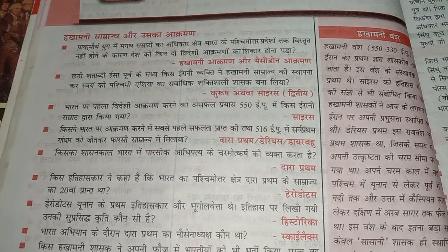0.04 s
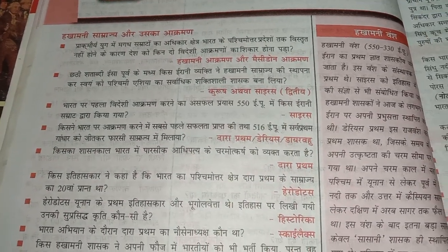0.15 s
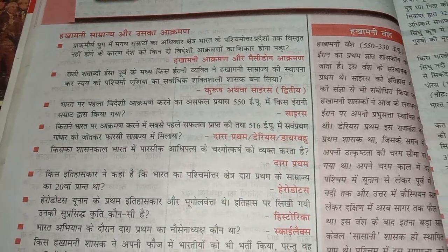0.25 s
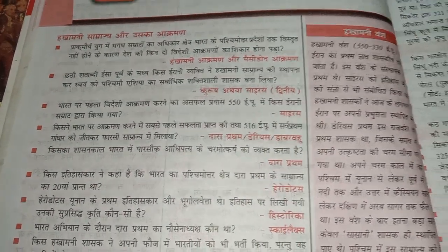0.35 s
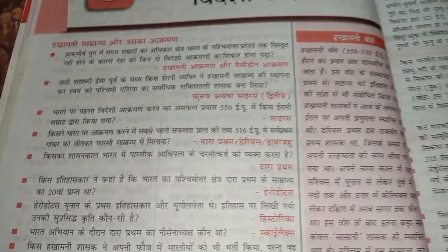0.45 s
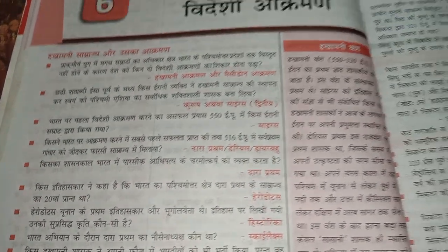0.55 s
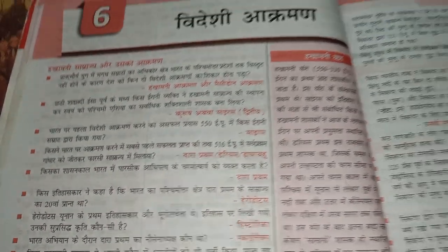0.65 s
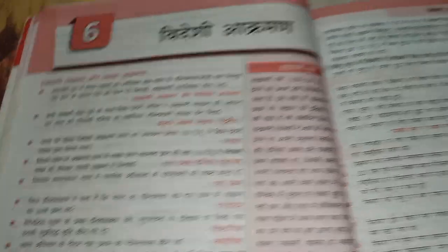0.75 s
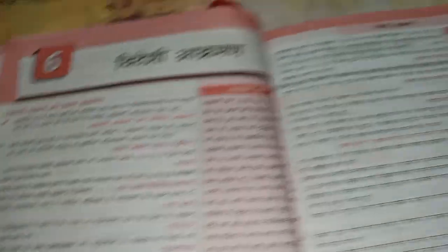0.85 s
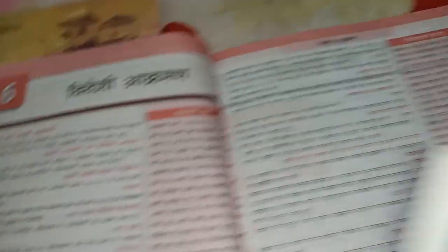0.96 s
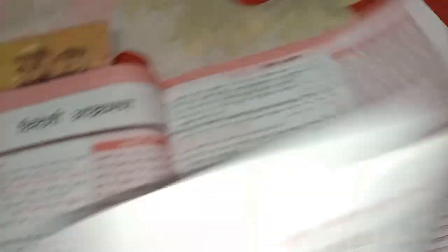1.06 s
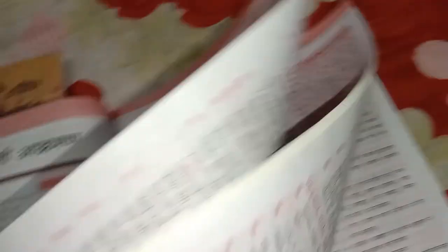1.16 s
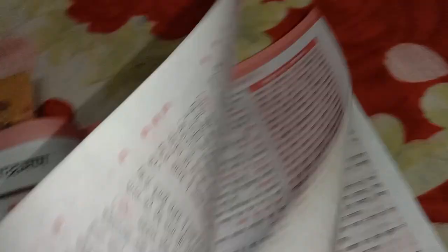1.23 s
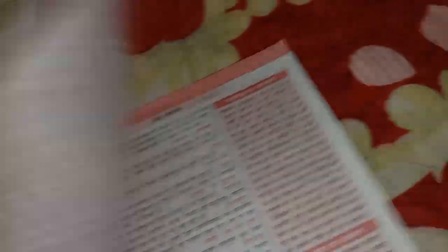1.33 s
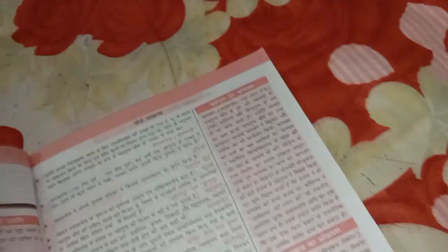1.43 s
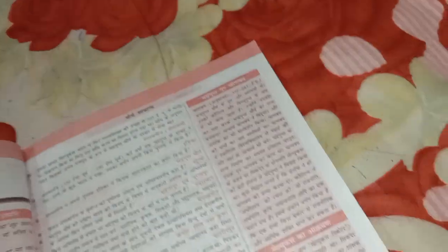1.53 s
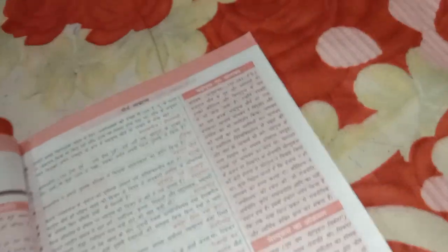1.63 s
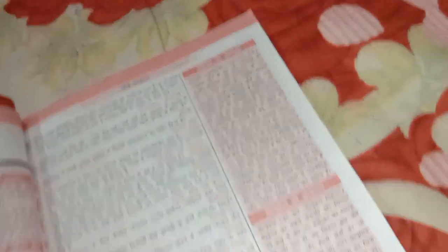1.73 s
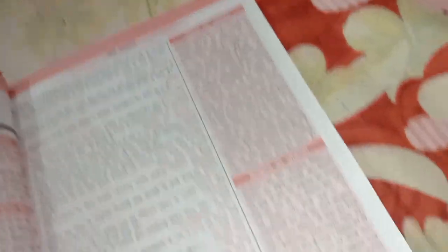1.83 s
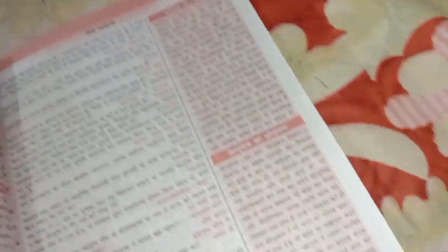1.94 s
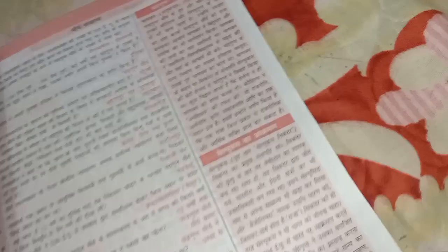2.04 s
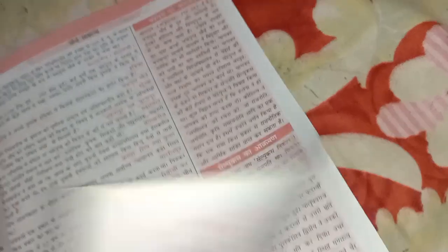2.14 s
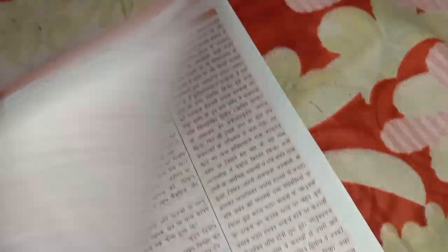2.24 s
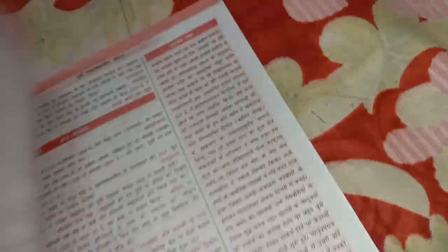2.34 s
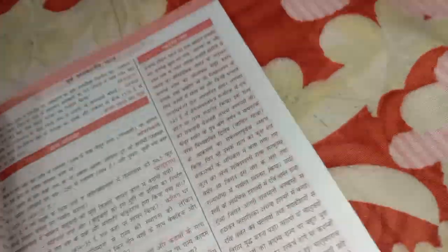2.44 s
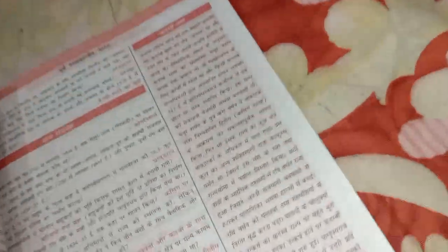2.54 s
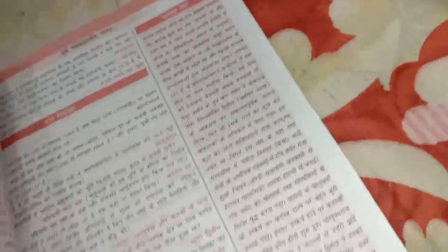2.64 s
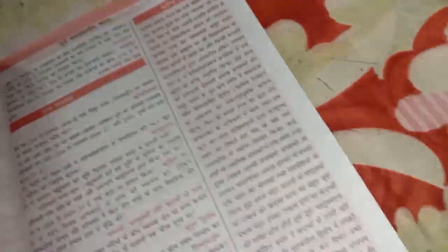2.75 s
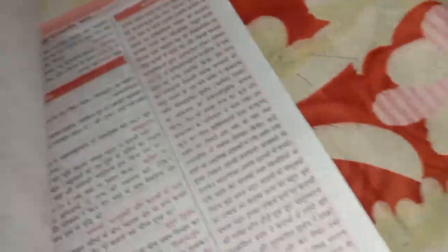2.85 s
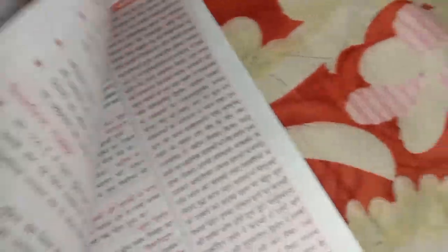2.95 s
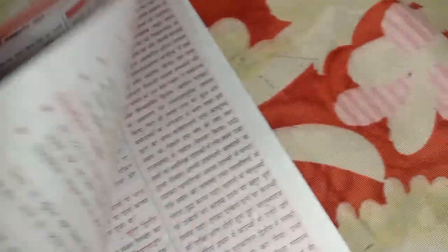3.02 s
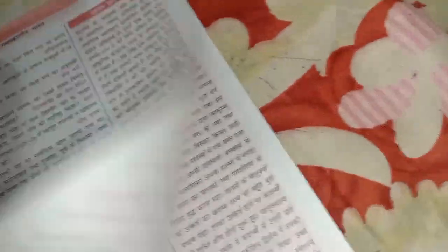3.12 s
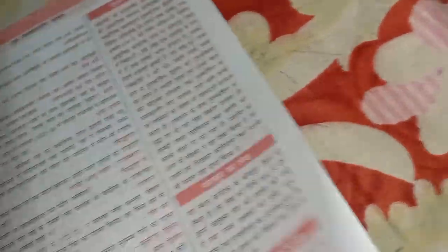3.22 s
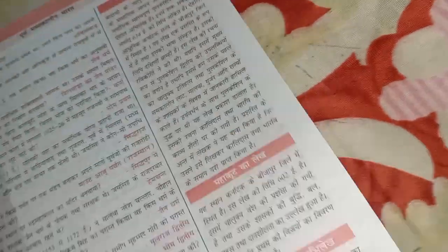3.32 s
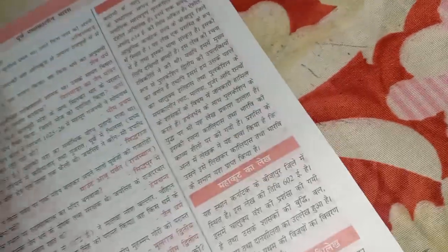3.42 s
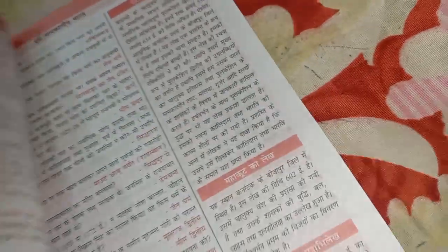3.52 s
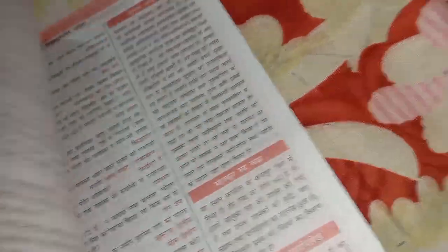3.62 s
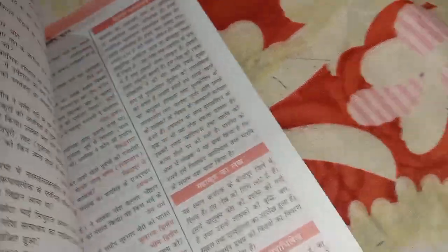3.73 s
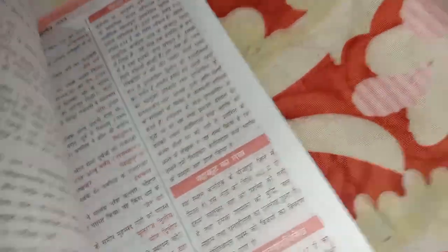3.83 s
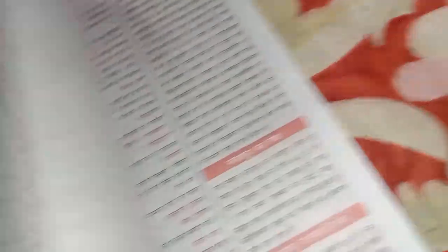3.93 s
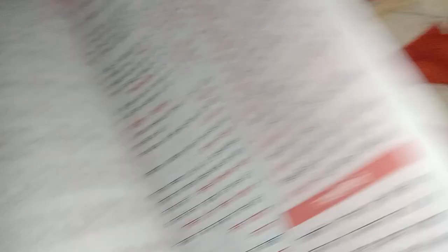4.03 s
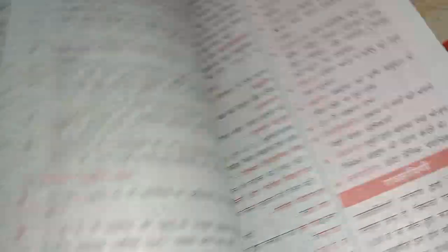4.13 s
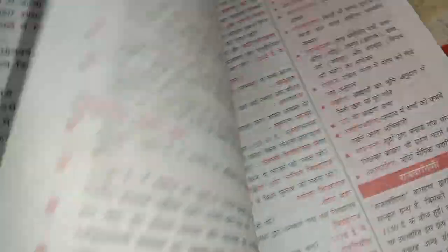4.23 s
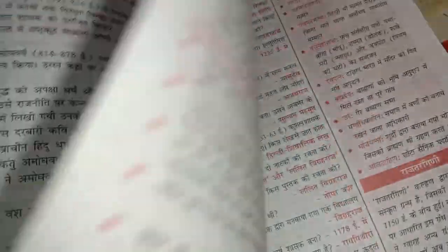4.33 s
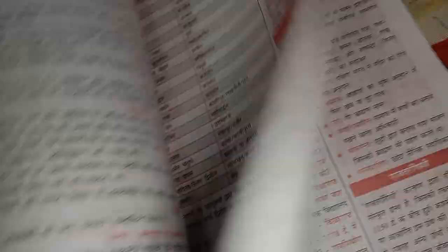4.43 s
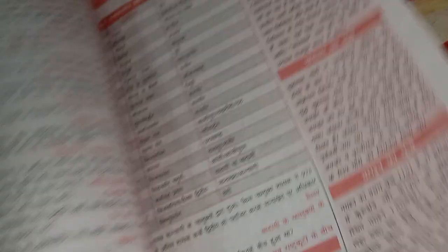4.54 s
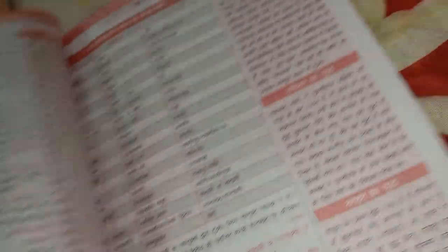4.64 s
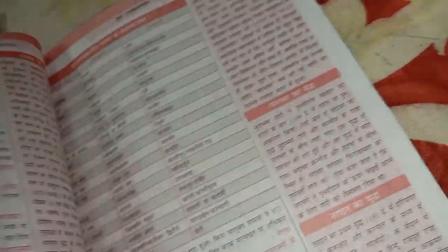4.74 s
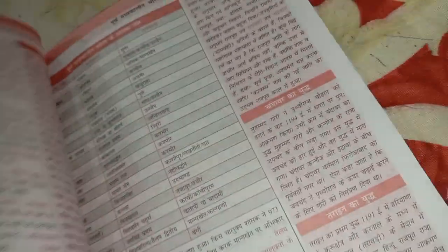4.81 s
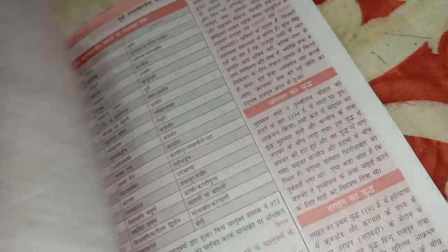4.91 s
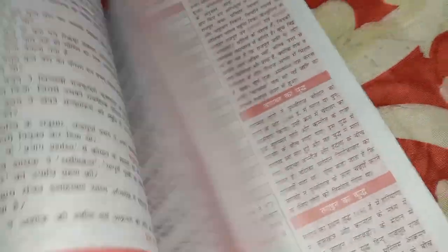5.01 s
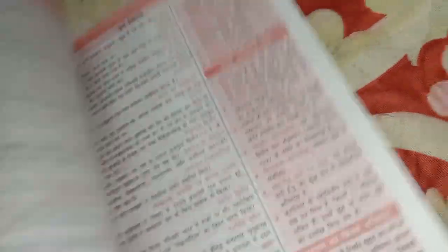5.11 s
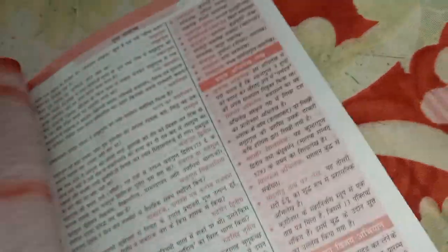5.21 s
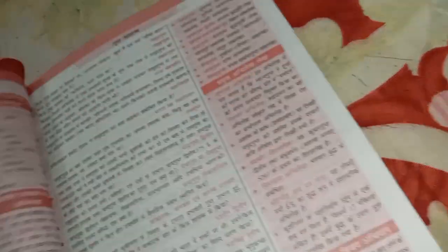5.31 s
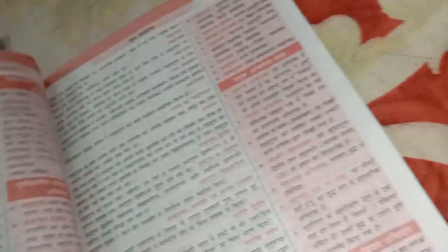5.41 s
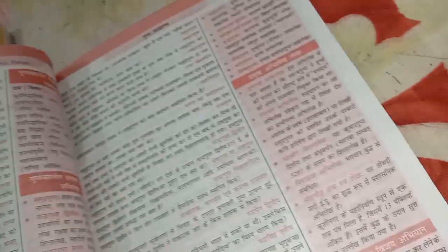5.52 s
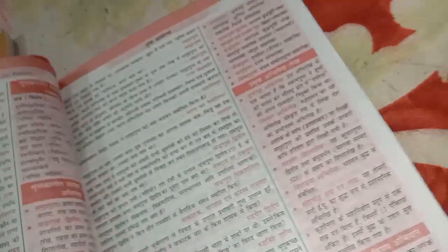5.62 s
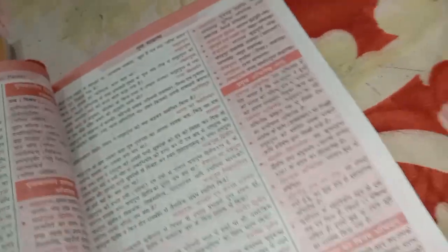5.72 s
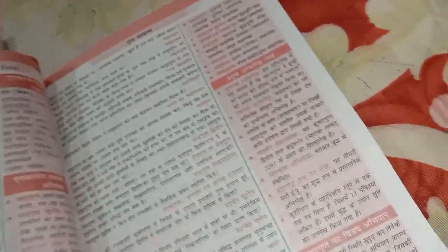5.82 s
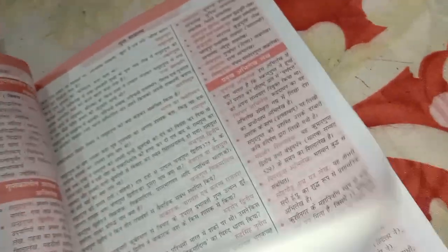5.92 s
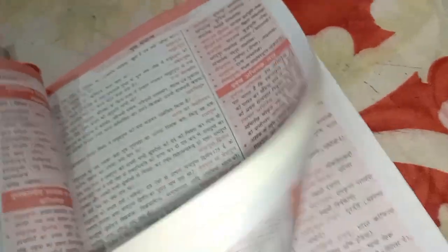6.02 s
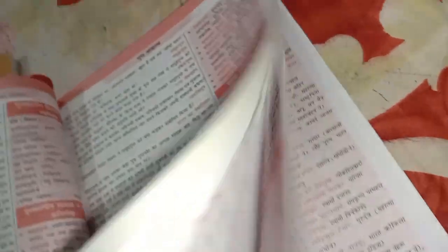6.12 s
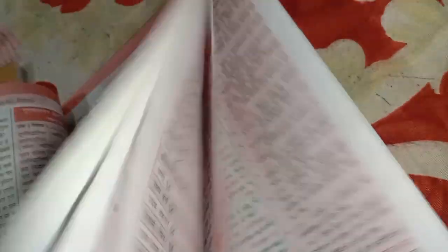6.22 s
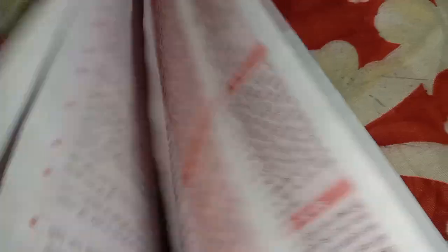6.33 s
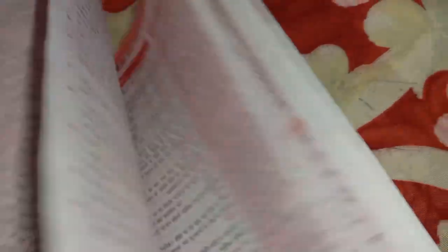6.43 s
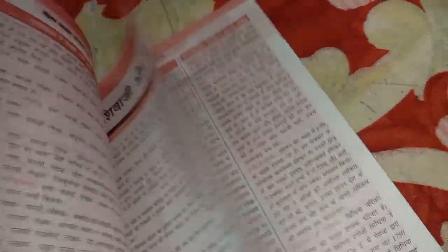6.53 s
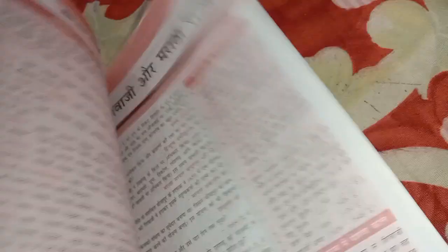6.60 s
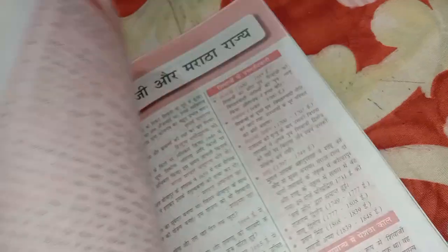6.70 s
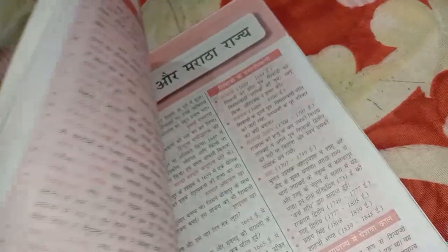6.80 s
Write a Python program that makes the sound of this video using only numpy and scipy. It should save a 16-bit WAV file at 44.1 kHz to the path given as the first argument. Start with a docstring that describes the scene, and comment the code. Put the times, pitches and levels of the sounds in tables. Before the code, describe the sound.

After a nearly silent half second with faint hiss, a hand leafs through a thick paper book. Sheets swish, buckle with sharp snaps, flap over and land with soft thumps, busiest from about 1.4 to 5.4 seconds. The rustle then thins to quieter rubbing and small crackles, with a last flick near the end. Close small microphone in a quiet furnished room, a thin, ringing midrange tone colouring each rustle.

```python
"""Leafing through a thick book

Pages are turned by hand, close to a small microphone in a quiet room. Sliding sheets hiss (shaped noise
and small grains), buckle with sharp snaps (short damped swings), flap over and land with soft thumps.
The block of pages rumbles, a faint low ring sounds late on, and soft steady noise is the air.
The microphone's housing rings most strongly near 1.25 kHz, which puts a thin tone under every rustle."""
import sys
import numpy as np
from scipy import signal
from scipy.fft import rfft, irfft, next_fast_len
from scipy.io import wavfile

SR = 44100
rng = np.random.default_rng(int(sys.argv[2]) if len(sys.argv) > 2 else 0)


def transcribe(signal):
    """Save signal, clipped to [-1, 1], as a 16-bit WAV file at the path in sys.argv[1]."""
    frames = np.atleast_2d(signal).T
    limited = np.clip(frames, -1, 1)
    pcm = np.round(limited * 32767).astype(np.int16)
    wavfile.write(sys.argv[1], SR, pcm)


N = 302526   # length in samples


def from_db(db):
    """Turn decibels into a gain."""
    return 10 ** (np.asarray(db) / 20)


def rms_one(x):
    """Scale to rms 1."""
    return x / np.sqrt(np.mean(x ** 2) + 1e-20)


def energy_one(x):
    """Scale to energy 1 (the sum of the squares)."""
    return x / np.sqrt(np.sum(x ** 2) + 1e-20)


def add(out, start_s, sound):
    """Mix a sound in at its start time; drop what runs past the end."""
    at = round(start_s * SR)
    out[at:at + len(sound)] += sound[:max(N - at, 0)]


def passed(x, hz, kind, order=2):
    """Butterworth filter: keep the lows, the highs or a band."""
    sections = signal.butter(order, hz, kind, fs=SR, output="sos")
    return signal.sosfilt(sections, x)


def resonance(x, hz, width_hz):
    """Two-pole resonance with gain 1 at its peak."""
    r = np.exp(-np.pi * width_hz / SR)
    zeros = np.array([1, 0, -1]) * (1 - r * r) / 2
    poles = [1, -2 * r * np.cos(2 * np.pi * hz / SR), r * r]
    return signal.lfilter(zeros, poles, x)


def gliding(x, hz, width_hz, size):
    """A resonance whose centre moves, stepped in blocks of a few samples; rms 1."""
    out, state = np.zeros(N), np.zeros(2)
    r = np.exp(-np.pi * width_hz / SR)
    x = np.diff(x, prepend=0)
    for i in range(0, N, size):
        poles = [1, -2 * r * np.cos(2 * np.pi * hz[i] / SR), r * r]
        out[i:i + size], state = signal.lfilter([1], poles, x[i:i + size], zi=state)
    return rms_one(out)


def coloured(x, spectrum):
    """Give a flat sound a spectrum, joined up between its points; rms 1."""
    size = next_fast_len(N)
    hz, db = np.transpose(spectrum)
    log_hz = np.log(np.fft.rfftfreq(size, 1 / SR) + 1)
    gain = from_db(np.interp(log_hz, np.log(hz), db))
    return rms_one(irfft(rfft(x, size) * gain, size)[:N])


def drift(rate):
    """Smooth chance: straight lines between normal random points, `rate` points per second."""
    return np.interp(np.arange(N) / SR * rate, np.arange(N), rng.standard_normal(N))


def puff(hz, cycles):
    """A soft push of air: a few quickly damped swings, whose outline peaks at 1."""
    turns = np.arange(SR // 8) / SR * hz
    swell = turns / cycles
    return np.sin(2 * np.pi * turns) * swell * np.exp(1 - swell)


def still_air(level_db=-81):
    """Still air: steady noise that is strongest in the lows."""
    # spectrum of the air: [f/Hz, level/dB]
    air_spectrum = [(25, -2), (100, 2.5), (300, 1), (700, -3.5), (1500, -8.5), (3500, -9.5), (7000, -19),
                    (10000, -11), (15500, -17)]
    return from_db(level_db) * coloured(rng.standard_normal(N), air_spectrum)


def room(x, t60_s=0.23, top_hz=4340):
    """A small furnished room answers with a short, dull tail of decaying noise."""
    t = np.arange(SR // 2) / SR
    # the first reflection takes 4 ms to arrive
    tail = rng.standard_normal(len(t)) * from_db(-60 * t / t60_s) * (t > .004)
    return signal.fftconvolve(x, energy_one(passed(tail, top_hz, "low")))[:N]


def low_ring(swell_s=0.014):
    """Something near the book rings on softly: sines that swell quickly and decay slowly."""
    # the rings, late in the scene: [t/s, starting level/dB, f/Hz, time to fall by 60 dB/s]
    rings = [(6.599, -53, 390, 0.62), (6.601, -62, 236, 0.82), (6.699, -59.5, 286, 0.45)]
    out, t = np.zeros(N), np.arange(SR) / SR
    for s, db, hz, t60_s in rings:
        swell = 1 - np.exp(-t / swell_s)
        add(out, s, swell * from_db(db - 60 * t / t60_s) * np.sin(2 * np.pi * hz * t))
    return out


def book_body(rumble_gain, rumble_db=-2, resting_db=-86, thump_db=-3):
    """The block of pages rumbles in the hands and is bumped by fingers and falling sheets."""
    # spectrum of the rumble: [f/Hz, level/dB]
    rumble_spectrum = [(25, -32), (45, -9), (65, -13.5), (115, -2), (220, -2.5), (330, -4), (700, -41)]
    # soft bumps, before thump_db is added: [t/s, level/dB, f/Hz]
    thumps = [(0.207, -48.5, 107), (0.374, -62, 110), (0.535, -58, 112), (1.443, -37, 200),
              (1.504, -38, 159), (1.535, -36, 124), (1.803, -47.5, 106), (1.932, -35, 276),
              (2.124, -52, 111), (2.169, -48, 104), (2.236, -51, 112), (2.395, -46, 130),
              (2.722, -44.5, 182), (3.037, -38.5, 136), (3.096, -46, 127), (3.393, -48, 130),
              (3.444, -45.5, 99), (3.664, -48, 146), (3.694, -43, 115), (4.227, -49, 235),
              (4.453, -46.5, 104), (4.50, -52, 107), (4.545, -50, 104), (4.586, -52, 101),
              (4.664, -51, 105), (4.71, -55, 92), (4.918, -42, 143), (5.397, -51, 155), (5.758, -47, 123),
              (5.87, -50, 149), (6.209, -49, 109), (6.695, -44.5, 176)]
    gain = rumble_gain * from_db(rumble_db) + from_db(resting_db)
    out = gain * coloured(rng.standard_normal(N), rumble_spectrum)
    for s, db, hz in thumps:
        add(out, s, from_db(db + thump_db) * puff(hz, cycles=0.65))
    return out


def flapping(uneven=0.037, uneven_db=5.0, level_db=-3):
    """A loose sheet whips to and fro: a row of puffs, on the whole weaker and weaker."""
    # sheets swinging over, before level_db is added:
    # [t/s, level/dB, f/Hz, flap rate/Hz, dying time/s]
    flaps = [(0.773, -51.5, 228, 84, 0.056), (2.390, -33.5, 414, 137, 0.0079),
             (2.403, -34.5, 228, 76, 0.062), (3.009, -28.5, 480, 130, 0.022),
             (3.028, -38.5, 303, 87, 0.056)]
    out = np.zeros(N)
    for s, db, hz, per_s, dying_s in flaps:
        for k, (late, strong) in enumerate(rng.standard_normal(size=(14, 2))):
            after_s = max(k + uneven * late, 0) / per_s
            gain = from_db(db + level_db + uneven_db * strong) * np.exp(-after_s / dying_s)
            add(out, s + after_s, gain * puff(hz, cycles=0.82))
    return out


def crinkles(friction_gain, hollow_gain, per_s=130, size_db=4, level_db=-3, uneven_db=4, count=12):
    """Tiny creases give way at random under the sliding sheet, each at one of a dozen pitches."""
    born = rng.random(N) < per_s * from_db(uneven_db * drift(14)) / SR
    sizes = from_db(size_db * np.minimum(rng.exponential(1, N), 2.5))
    clicks = born * sizes * rng.choice([-1, 1], N)
    pitch_number = rng.integers(0, count, N)
    ticks = np.zeros(N)
    for k, hz in enumerate(np.geomspace(700, 3800, count)):
        swing = resonance(clicks * (pitch_number == k) + 1e-18, hz, 0.27 * hz)
        # a crease takes time to fold, so it holds little above its own pitch
        ticks += energy_one(passed(swing, 1.55 * hz, "low", order=4))
    # a bent sheet creases more than a flat one
    return from_db(level_db) * np.sqrt(friction_gain * hollow_gain) * rms_one(ticks)


def snaps(crumple_db=-21, damping=0.48, spread_s=.00035, split_db=-11, split_growth=1.04, hard_db=-31):
    """A buckle pops through: one short swing of the sheet, a crack, a dull body and a brief crumple."""
    # paper buckling: [t/s, level over 5 ms/dB, f/Hz, crack against swing/dB, crumple time/s]
    buckles = [(0.824, -45.5, 1320, -21, 0.0013), (1.008, -47, 1460, -27, 0.0008),
               (1.259, -40.5, 1110, -17, .002), (1.352, -39, 1020, -34, 0.0039),
               (1.364, -44, 1540, -36, 0.0066), (1.392, -45, 1640, -28, 0.0027),
               (1.418, -34, 1820, -30, 0.0011), (1.435, -25.5, 2240, -6, 0.0014),
               (1.45, -25, 1480, -9, 0.0021), (1.5, -26.5, 1470, -32, .008), (1.507, -28, 2500, -21, .005),
               (1.514, -32, 2240, -13, 0.0042), (1.638, -39.5, 1820, -32, 0.0051),
               (1.745, -31, 2530, -15, 0.0017), (1.8018, -24.5, 1750, -23, 0.00099),
               (1.82, -35, 1940, -22, .001), (1.931, -38, 880, -25, 0.0065),
               (2.323, -39, 1100, -11, 0.0022), (2.3475, -32, 960, -18, 0.0017),
               (2.3944, -34.5, 2580, 1, 0.0018), (2.413, -43.5, 2470, -8, .002),
               (2.6719, -32, 3200, -13.5, 0.0013), (2.723, -26, 2330, -9, 0.0015),
               (2.738, -26.5, 3370, 7, 0.00063), (2.858, -39.5, 2000, -16, 0.0022),
               (2.93, -39, 1690, -28, 0.0025), (3.021, -44, 1580, -9, 0.0034),
               (3.095, -36, 1670, -24, 0.0048), (3.353, -34, 1630, -23, 0.00066),
               (3.477, -32.5, 1830, -26, 0.0054), (3.586, -23.5, 2080, -11, 0.0042),
               (3.659, -26, 3130, -8, 0.00095), (3.6643, -29.5, 1580, -20, 0.0027),
               (3.721, -36, 1420, -31, 0.0038), (3.81, -38, 1290, -32, .001),
               (3.871, -41, 1340, -16, 0.0025), (4.123, -33, 1770, -8, 0.0019),
               (4.159, -36.5, 1750, -1, 0.0069), (4.696, -37, 1410, -6, 0.00092),
               (4.79, -32.5, 2230, -11, .004), (4.8559, -41, 1440, -24, 0.0012),
               (4.916, -31, 1620, -13, .002), (4.925, -29, 2370, -4, 0.0014),
               (4.9545, -25.5, 3100, -15, 0.0025), (4.974, -34, 2420, -3, .0014),
               (4.9835, -29.5, 2720, -9, .0016), (5.065, -28, 2350, -5, 0.0016),
               (5.075, -27, 1830, -23, 0.0029), (5.154, -38.5, 1790, -14, 0.0037),
               (5.183, -31.5, 2140, -2.5, 0.004), (5.23, -37, 1950, -8, 0.0015),
               (5.278, -26.5, 2160, -8, 0.0011), (5.307, -33, 1210, -33, 0.0004),
               (5.35, -41.5, 2380, -5, 0.0037), (5.406, -40, 1480, -30, .0017),
               (5.55, -46.5, 870, -33, .003), (5.726, -44.5, 1360, -8, 0.0038),
               (5.911, -51, 1150, -19, .0016), (6.0964, -46.5, 830, -29, 0.0025),
               (6.233, -47.5, 1410, -16, 0.0018), (6.282, -45.5, 1000, -8, .0016),
               (6.291, -47.5, 1310, -19, 0.0033), (6.318, -47, 1260, -13, .003),
               (6.376, -37.5, 1740, -5, .005), (6.3876, -42.5, 1190, -19, .001),
               (6.407, -52, 1260, 3, 0.0056), (6.4842, -31, 1390, -32, 0.0022),
               (6.586, -41.5, 1510, -29, 0.0036), (6.698, -39.5, 3310, -25, 0.0025),
               (6.701, -33.5, 2320, -32, 0.0038)]
    out, t = np.zeros(N), np.arange(SR // 12) / SR
    for s, db, hz, crack_db, crumple_s in buckles:
        # wide, low buckles move more of the sheet and sound fuller: 12.5 dB less body per octave up
        body_db = -14 - 12.5 * np.log2(hz / 1700)
        age = t / (crumple_s / 2)
        crumple = rng.standard_normal(len(t)) * age * np.exp(1 - age)
        push = (t == 0) + from_db(crumple_db) * crumple
        swing = passed(resonance(push, hz, damping * hz), 3680, "low", order=4)
        swing = energy_one(passed(swing, 310, "high"))
        # the crack runs along the crease for a fraction of a millisecond
        run = push + 0.5 * np.roll(push, round(spread_s * SR))
        run -= 0.5 * np.roll(push, round(np.e * spread_s * SR))
        crack = passed(resonance(run, 3440, 1600), 4030, "high", order=4)
        crack = energy_one(passed(crack, 7400, "low", order=4))
        body = energy_one(passed(push, [260, 950], "band"))
        # cracks weaker than hard_db lose their highest part fastest
        split_gain = from_db(split_db + split_growth * min(db + crack_db - hard_db, 0))
        split = split_gain * energy_one(passed(push, 5400, "high"))
        pop = energy_one(swing + from_db(crack_db) * crack + from_db(body_db) * body + split)
        add(out, s, from_db(db) * np.sqrt(SR * .005) * pop)
    return out


def stroke(age, rise_s, hold_s, fade_db_per_s):
    """Gain of one movement of the hand: it swells, holds and dies away."""
    fading_s = np.maximum(age - rise_s - hold_s, 0)
    return np.clip(age / rise_s, 0, 1) * from_db(-fade_db_per_s * fading_s)


def leafing(size=32):
    """All movements add up in power, giving gains of friction, edge, sizzle, hollow, rumble; gap pitch."""
    # a sheet slides over its neighbour: [t/s, rise/s, hold/s, friction/dB,
    # edge hiss against friction/dB, sizzle against friction/dB, starting f of the air gap/Hz]
    slides = [(0.538, 0.26, 0.2, -62.5, 0.5, -1.5, 2320), (1.073, 0.058, 0.037, -38.5, -4, -10.5, 3820),
              (1.232, .02, 0.018, -51.5, -16, -15, 1500), (1.43, 0.012, 0.017, -32.5, -9.5, -17, 1700),
              (1.496, .008, 0.013, -36.5, -11, -13, 1790), (1.515, 0.024, 0.024, -39, -6.5, -7.5, 2200),
              (1.624, 0.021, 0.027, -49, -9, -24, 1910), (1.71, 0.073, 0.066, -44.5, -3.5, -11, 2650),
              (1.885, .03, 0.068, -55, -1, -7, 1700), (2.086, 0.04, 0.1, -56, -2.5, -16, 1810),
              (2.214, 0.082, 0.086, -56, 0.5, -3, 2630), (2.388, 0.022, 0.025, -45, -3.5, -9, 2340),
              (2.473, 0.11, 0.12, -59.5, 1, -14, 1700), (2.687, 0.033, 0.033, -46.5, 4.5, 4.5, 3800),
              (2.737, 0.049, 0.045, -39.5, -5, -7, 2530), (2.85, 0.023, 0.15, -51.5, -4, -13, 1700),
              (3.065, 0.02, 0.19, -52.5, -2, -7.5, 2300), (3.312, .04, 0.085, -36.5, -6.5, -8, 3040),
              (3.437, 0.075, 0.036, -39, -6.5, -8.5, 2560), (3.537, 0.044, 0.067, -43, 2, -5, 3100),
              (3.653, 0.019, 0.018, -39.5, -14, -11, 1600), (3.738, 0.04, 0.098, -49.5, -4.5, -10, 1610),
              (3.924, 0.046, 0.087, -41, -3, -4, 2800), (4.018, 0.051, 0.021, -37.5, -6, -10, 2080),
              (4.147, .02, .12, -55.5, -0.5, -6, 1700), (4.368, 0.071, 0.068, -50, -3.5, -7, 2650),
              (4.53, 0.072, 0.094, -48, -8.5, -18, 2030), (4.759, 0.031, .02, -42, -4.5, -25, 2330),
              (4.836, 0.019, .01, -47, -3, -6, 2210), (4.912, 0.031, 0.037, -35.5, -5, -32, 2280),
              (5.061, 0.015, 0.021, -39.5, -6, -12, 2000), (5.168, 0.02, 0.027, -43.5, -8, -26, 2010),
              (5.266, .02, 0.12, -47, -7.5, -23, 1580), (5.329, 0.019, 0.0084, -52, -1.5, -4, 2000),
              (5.542, 0.13, 0.082, -57, 2, -8, 2100), (5.768, 0.11, 0.047, -58.5, 0.5, -10, 1450),
              (5.976, 0.056, 0.089, -67, 2, -10, 1510), (6.122, 0.018, 0.0092, -52.5, -0.5, -3, 1590),
              (6.157, 0.022, .16, -58.5, -2, -19, 2420), (6.35, 0.027, 0.036, -52.5, -7, -23, 1500),
              (6.472, 0.014, .02, -54.5, -7.5, -24, 1400), (6.578, 0.011, 0.011, -51, -22, -36, 2500),
              (6.685, 0.0091, 0.0085, -47.5, -35, -38, 2230)]
    # a bunch of sheets is bent over or settles: [t/s, length/s, hollow rub/dB, rumble/dB]
    bends = [(0.722, 0.12, -67, -60), (1.0, 0.02, -60, -84), (1.129, 0.15, -51.5, -66),
             (1.328, 0.1, -46, -61.5), (1.393, 0.13, -41.5, -48.5), (1.563, .12, -63.5, -57.5),
             (1.75, 0.099, -60.5, -65), (1.92, 0.071, -65.5, -57.5), (2.312, 0.18, -54, -55.5),
             (2.567, 0.078, -47.5, -57), (2.69, 0.037, -50.5, -53), (2.764, 0.12, -53.5, -57.5),
             (2.924, 0.2, -61, -57.5), (3.145, .1, -63.5, -65), (3.262, 0.14, -54.5, -64),
             (3.628, 0.097, -44.5, -54), (3.733, 0.075, -58, -61), (4.06, .18, -55, -66),
             (4.384, 0.16, -65, -85), (4.617, 0.11, -60, -82), (4.825, 0.064, -50, -65),
             (4.901, 0.072, -43, -56), (5.065, 0.071, -62, -61), (5.17, 0.064, -49.5, -67),
             (5.297, 0.13, -47.5, -59), (5.692, 0.095, -55.5, -61), (5.83, 0.11, -56.5, -62.5),
             (5.96, .05, -68, -70), (6.11, 0.14, -58, -71), (6.259, 0.15, -52, -59),
             (6.482, 0.028, -56, -70), (6.575, 0.025, -55, -81), (6.691, 0.012, -50, -71)]
    slide_fade_db_per_s = 124   # a sheet that is let go runs out at least this fast
    flick_fade_db = 3   # extra fade per length of the stroke: short flicks stop sooner
    edge_fade_db_per_s, sizzle_fade_db_per_s = 6, 22   # the cut edge lifts clear first: slides dull
    edge_power, sizzle_power = 0.94, 1.46   # how edge hiss and sizzle grow with speed; friction has 1
    gap_open_hz, gap_opens_s = 1450, 0.27   # the hiss moves to this pitch as the gap widens
    bend_swell, bend_fade_db_per_s = 0.36, 216   # share of a bend spent swelling; fade after its length
    bend_friction_db = -6   # bent sheets also rub face to face, against the hollow rub

    t = np.arange(0, N, size) / SR
    # the hands never hold the book quite still, so it rubs and rumbles faintly nearly all along
    held = stroke(t - 0.57, rise_s=0.2, hold_s=5.9, fade_db_per_s=bend_fade_db_per_s)
    hollow = (held * from_db(-71)) ** 2
    rumble = (held * from_db(-76)) ** 2
    friction, edge, sizzle, lift = np.zeros((4, len(t)))
    for s, rise_s, hold_s, db, edge_db, sizzle_db, hz in slides:
        age = np.maximum(t - s, 0)
        fade_db_per_s = slide_fade_db_per_s + flick_fade_db / (rise_s + hold_s)
        speed = stroke(age, rise_s, hold_s, fade_db_per_s)
        power = (speed * from_db(db)) ** 2
        friction += power
        edge += (speed ** edge_power * from_db(db + edge_db - edge_fade_db_per_s * age)) ** 2
        sizzle += (speed ** sizzle_power * from_db(db + sizzle_db - sizzle_fade_db_per_s * age)) ** 2
        opening = np.exp(-np.maximum(age - rise_s, 0) / gap_opens_s)
        lift += power * (hz - gap_open_hz) * opening
    for s, length_s, hollow_db, rumble_db in bends:
        bend = stroke(t - s, bend_swell * length_s, (1 - bend_swell) * length_s, bend_fade_db_per_s)
        hollow += (bend * from_db(hollow_db)) ** 2
        friction += (bend * from_db(hollow_db + bend_friction_db)) ** 2
        rumble += (bend * from_db(rumble_db)) ** 2
    # an average weighted by power: the loudest movement counts most
    gap_hz = gap_open_hz + lift / (friction + 1e-20)
    controls = [*np.sqrt([friction, edge, sizzle, hollow, rumble]), gap_hz]
    return [np.interp(np.arange(N) / SR, t, control) for control in controls]


def rubbing(grip, catches_per_s, size_db, grain_db, uneven_db):
    """Countless fibres slip as a smooth hiss; a few catch and let go as separate grains."""
    caught = rng.random(N) < catches_per_s * from_db(grip) / SR
    sizes = from_db(size_db * np.minimum(rng.exponential(1, N), 4)) * rng.choice([-1, 1], N)
    grains = from_db(grain_db) * rms_one(caught * sizes)
    return (rng.standard_normal(N) + grains) * from_db(uneven_db * grip / 2)


def sliding(friction_gain, edge_gain, sizzle_gain, hollow_gain, gap_hz, gap_db=3):
    """One uneven grip drives the faces, the edge and the hollow of the moving sheet."""
    # spectra of the rubbing faces, cut edge, top sizzle and hollow rub: [f/Hz, level/dB]
    friction_spectrum = [(400, -24), (750, -3.5), (1100, -4.5), (1700, 4), (2500, 0.5), (3400, -0.5),
                         (4500, -14), (7000, -39), (16000, -50)]
    edge_spectrum = [(1800, -47), (3000, 4), (3800, 6.5), (4500, -1), (5400, 3), (6200, -3), (7300, -4),
                     (8100, -10), (16000, -30.5)]
    sizzle_spectrum = [(6000, -23), (8500, 0), (11000, 3), (12300, -4), (13600, -14), (14600, 2.5),
                       (15600, 0)]
    hollow_spectrum = [(100, -11), (220, -6), (400, 0), (800, -0.5), (1100, -4.5), (1600, -30), (3000, -67)]
    grip = 2 * drift(90)
    faces = rubbing(grip, catches_per_s=400, size_db=4.0, grain_db=-2.5, uneven_db=4.0)
    # the air gap under the sheet colours the hiss, and trembles as the sheet does
    trembling_hz = gap_hz * from_db(1.2 * drift(35))
    gap = gliding(rng.standard_normal(N), trembling_hz, width_hz=1250, size=128)
    edge = rubbing(grip, catches_per_s=1300, size_db=5.5, grain_db=-13.0, uneven_db=1.2)
    hollow = rubbing(grip, catches_per_s=220, size_db=7.5, grain_db=-2.0, uneven_db=3.0)
    out = friction_gain * from_db(-1.0) * coloured(faces + from_db(gap_db) * gap, friction_spectrum)
    out += edge_gain * coloured(edge, edge_spectrum)
    out += sizzle_gain * coloured(edge, sizzle_spectrum)
    out += hollow_gain * from_db(-2.6) * coloured(hollow, hollow_spectrum)
    return out


def scene(room_db=-16.5):
    """Paper and book in the room, over still air."""
    friction, edge, sizzle, hollow, rumble, gap_hz = leafing()
    hits = snaps() + flapping() + crinkles(friction, hollow)
    paper = sliding(friction, edge, sizzle, hollow, gap_hz) + hits
    # only the hits are given an echo
    book = paper + from_db(room_db) * room(hits) + book_body(rumble) + low_ring()
    # so small a source radiates hardly any deep bass
    return (passed(book, 56, "high", order=3) + still_air())[None]


def record(dry, knee_hz=7500, top_db=-12, cutoff_hz=15650):
    """The microphone's housing rings, the treble above the knee is weak, and the very top is cut."""
    # resonances of the housing: [f/Hz, width/Hz, gain against the direct sound/dB]
    housing = [(842, 37, -6), (1020, 110, -13), (1251, 95, 7), (1260, 59, 4.5), (6710, 210, -4.5)]
    x = dry + sum(from_db(db) * resonance(dry, hz, width_hz) for hz, width_hz, db in housing)
    # all of the lows, plus a quiet share of the treble
    lows = signal.firwin(129, knee_hz, fs=SR) * (1 - from_db(top_db))
    x = signal.fftconvolve(x, lows[None], "same") + from_db(top_db) * x
    steep_cut = signal.ellip(10, .1, 70, cutoff_hz, fs=SR, output="sos")
    return signal.sosfilt(steep_cut, x)


dry = scene()
out = record(dry)
transcribe(out)
```